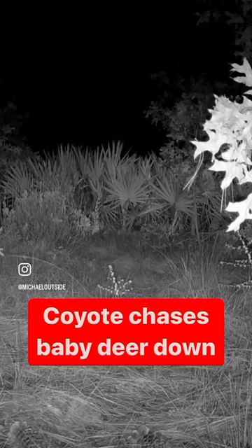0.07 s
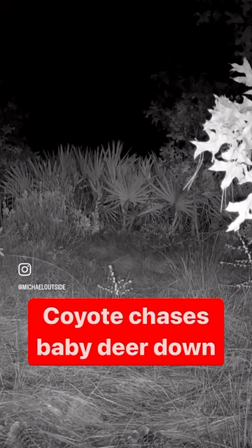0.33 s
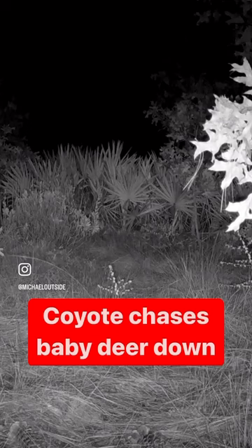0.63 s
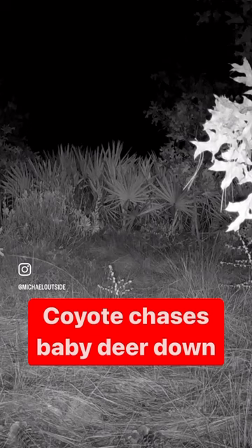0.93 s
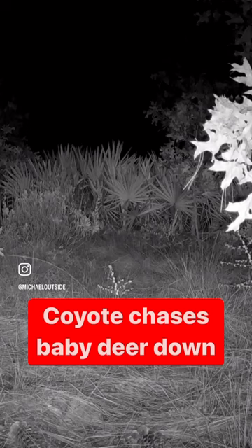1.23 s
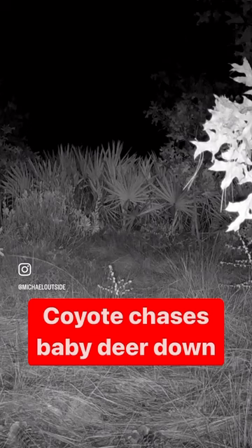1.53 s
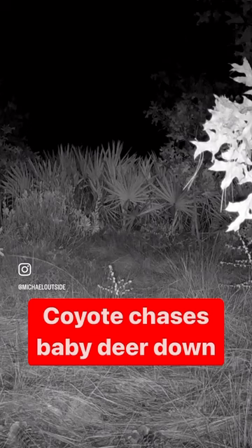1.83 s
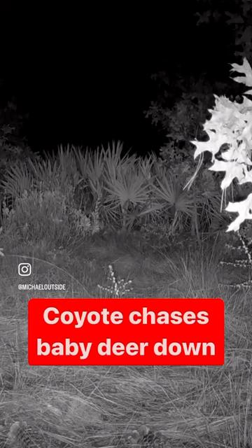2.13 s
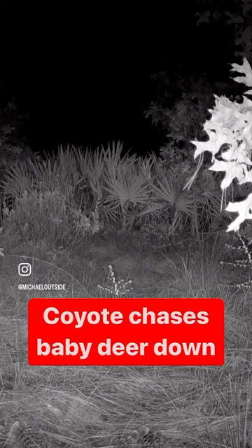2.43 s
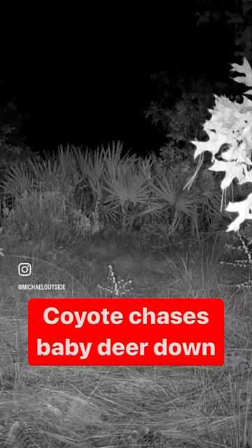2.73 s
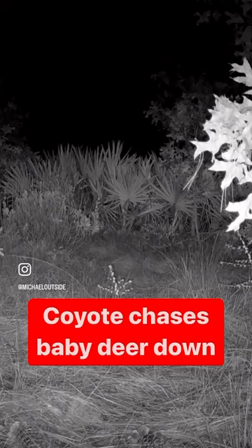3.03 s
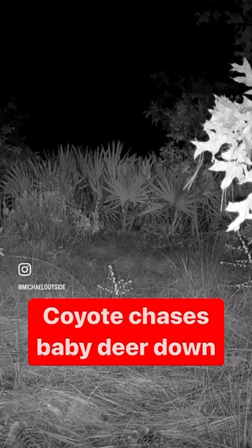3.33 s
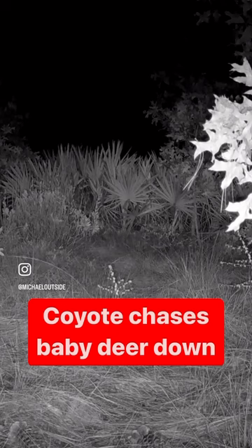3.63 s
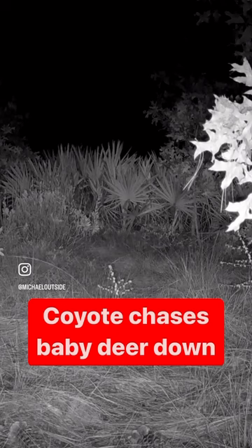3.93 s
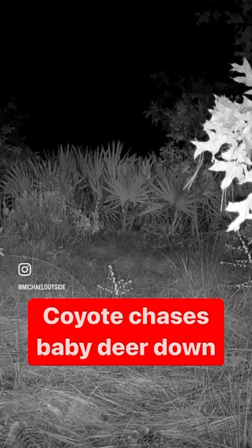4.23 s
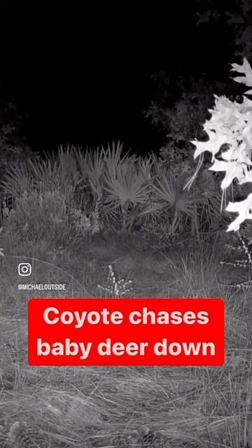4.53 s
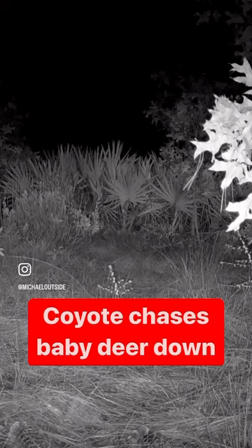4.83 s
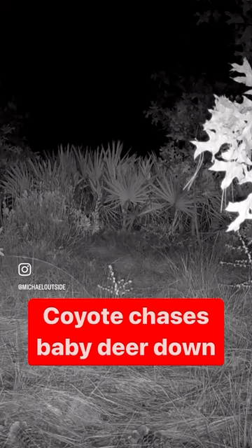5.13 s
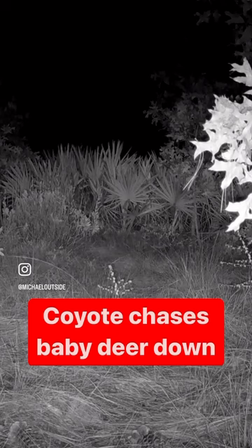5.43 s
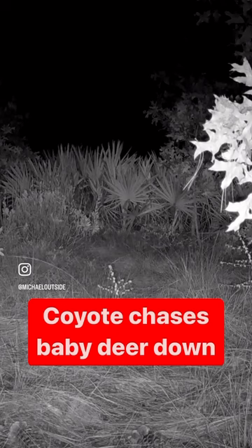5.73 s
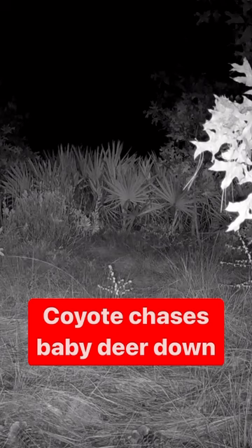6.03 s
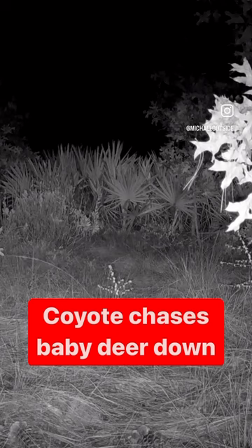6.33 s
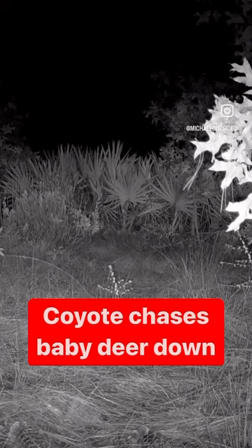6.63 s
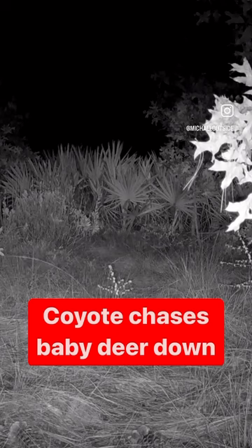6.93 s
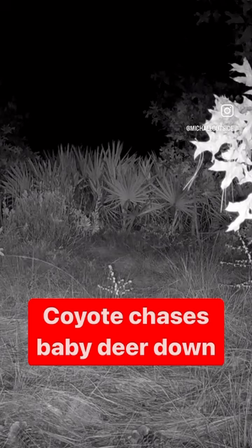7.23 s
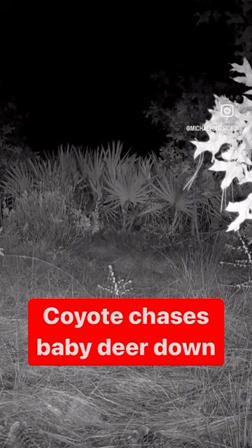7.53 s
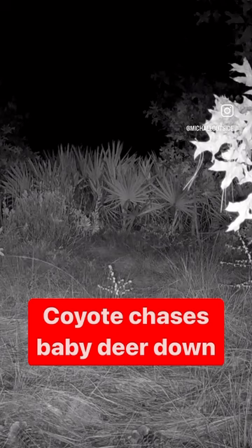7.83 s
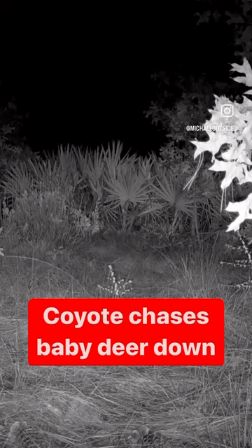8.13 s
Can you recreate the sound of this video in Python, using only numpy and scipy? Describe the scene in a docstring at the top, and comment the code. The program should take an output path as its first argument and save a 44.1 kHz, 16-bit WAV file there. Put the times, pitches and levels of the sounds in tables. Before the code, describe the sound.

A fawn gives one loud, cracking bleat over a trilling cricket, then animals rustle and crunch faintly through the brush.

```python
"""A fawn gives one loud bleat that cracks and falls away, and the night-time trees ring after it.
Its voice is a stack of tones from the throat, shaped by the mouth and roughened by puffs of air.
Animals push through the brush, mostly after the cry: leaves rustle, stalks crunch, feet thud.
A cricket trills by scraping its wings, pausing twice, over a soft hush and a far-off rumble."""
import sys
import numpy as np
from scipy import signal
from scipy.fft import rfft, irfft, next_fast_len
from scipy.io import wavfile
from scipy.ndimage import map_coordinates

SR = 44100
rng = np.random.default_rng(int(sys.argv[2]) if len(sys.argv) > 2 else 0)


def store_pcm(level_fs):
    """Save levels as 16-bit WAV."""
    pcm = np.round(np.clip(level_fs, -1, 1) * 32767).astype(np.int16)
    wavfile.write(sys.argv[1], SR, np.atleast_2d(pcm).T)


N = 360297

# tone colour of rubbed stems (frequency [Hz], relative level [dB])
STEM_COLOUR = [(100, -33.5), (400, -15.5), (950, -13.5), (1400, 1), (2500, 1), (3300, -10.5), (5000, -32.5),
               (8000, -49.5)]
# tone colour of dry leaf tips (frequency [Hz], relative level [dB])
LEAF_COLOUR = [(1500, -14.5), (3000, 5.5), (4000, 3.5), (5200, -4), (7000, -15.5), (8800, -26.5),
               (14000, -35)]


def fawn(jitter=0.0118, shimmer=0.84, flutter_db=5, wobble=0.95, mouth_db=10, mouth_width_hz=480):
    """A strained bleat: the vocal folds buzz, the moving mouth lifts some overtones, and air rasps."""
    # overtones of the throat (frequency [Hz], relative level [dB])
    throat = [(1700, 6), (2600, -0.5), (3300, -1.5), (3900, -1), (4600, -4), (5200, -16), (5900, -18),
              (6600, -28), (7300, -33), (8500, -51.5), (13000, -69)]
    # tone colour of the rasp (frequency [Hz], relative level [dB])
    rasp_colour = [(300, -34.5), (800, -25), (1200, -11), (2000, -4), (2900, 16), (4300, -0.5), (6000, 2),
                   (8000, -51), (14000, -58.5)]
    gate, pitch, octave_db, over_db, mouth_hz, rough = bleat_shape()
    on = gate > 0
    shaky_pitch = pitch * (1 + jitter * (0.13 + 2 * rough) * walk(700))
    phase = 2 * np.pi * np.cumsum(shaky_pitch)[on] / SR
    overtones, power = 0, 0
    for k in np.arange(3, 17):
        hz = k * pitch[on]
        mouth_lift = undb(mouth_db * np.exp(-((hz - mouth_hz[on]) / mouth_width_hz) ** 2))
        # high tones flutter most, in level and timing, as the head moves behind the leaves
        flutter = np.minimum(hz / 4000, 1) ** 2
        gain = gain_at(hz, throat) * mouth_lift * undb(flutter_db * flutter * walk(70)[on])
        lag = rng.uniform(0, 2 * np.pi) + wobble * flutter * (walk(100) + rough * walk(400))[on]
        overtones += gain * np.sin(k * phase + lag)
        power += gain ** 2
    # where the voice is rough the folds shut with uneven force
    overtones = overtones / np.sqrt(power) * (1 + shimmer * rough * walk(600))[on]
    # the cry starts thin; its lowest tone grows once the pitch has settled
    lowest_db = over_db[on] + np.interp(clock()[on], [4.68, 4.77], [-38, -29])
    core = undb(octave_db[on]) * np.sin(2 * phase) + undb(lowest_db) * np.sin(phase)
    # air escapes in a puff each time the folds open
    rasp = (noise(rasp_colour) * rough * undb(over_db - 9))[on] * (1 + np.cos(phase))
    voice = np.zeros(N)
    voice[on] = np.sqrt(2) * (core + undb(over_db[on]) * overtones) + rasp
    return gate * voice


def bleat_shape(start_s=4.495, end_s=5.05, attack_s=0.042, release_s=0.029, settle_s=0.038):
    """How the bleat moves over time: it starts and ends rough, and cracks three times."""
    # the pitch scoops up, slips at a crack, holds and falls away (time [s], pitch [Hz])
    melody = [(4.51, 522), (4.585, 634), (4.66, 680.6), (4.705, 669.3), (4.72, 635.7), (4.765, 662),
              (4.82, 649.8), (4.978, 648.2), (5.008, 561.6), (5.05, 521)]
    # where the mouth rings (time [s], frequency [Hz])
    mouth = [(4.52, 3120), (4.6, 3790), (4.7, 3380), (4.725, 2100), (4.79, 3420), (4.84, 2352), (4.9, 2380),
             (4.94, 3500), (4.99, 2752)]
    # the voice's effort (time [s], tone an octave above the pitch [dB], higher overtones [dB])
    effort = [(4.52, -72.5, -45.5), (4.585, -37, -42.5), (4.645, -28, -39), (4.725, -29, -35),
              (4.795, -43, -39.5), (4.83, -27.5, -38.5), (4.89, -27.5, -29.5), (4.935, -35.5, -31.5),
              (4.975, -33, -38), (5.025, -36.5, -38.5)]
    # cracks in the voice (time [s], added roughness [0-1], jump in level [dB])
    cracks = [(4.724, 0.06, 3.5), (4.817, 0.34, 1.5), (4.994, 0.17, 6.5)]
    pitch, = curves(melody)
    mouth_hz, = curves(mouth)
    octave_db, over_db = curves(effort)
    since, left = np.maximum(clock() - start_s, 0), np.maximum(end_s - clock(), 0)
    gate = np.minimum(since / attack_s, 1) * np.minimum(left / release_s, 1)
    rough = 0.15 + 0.65 * np.exp(-(np.minimum(since, left) / settle_s) ** 2)
    for at, added_rough, jump_db in cracks:
        crack = bump(at, half_s=0.0093)
        rough += added_rough * crack
        octave_db += jump_db * crack
        over_db += jump_db * crack
    octave_db -= 25 * bump(4.795, half_s=0.017)  # this tone drops out for a moment
    return gate, pitch, octave_db, over_db, mouth_hz, rough


def brush(rise_share=0.43, stir_stems_db=-76, stir_leaves_db=-97):
    """Bodies drag through softly stirring stems and leaves: each push is a swelling patter of ticks."""
    # pushes through the brush (peak time [s], stem level [dB], leaf level [dB], fade time [s])
    pushes = [(1.226, -54, -78, 0.1), (3.3, -66.5, -77.5, .12), (4.5, -60.5, -66, 0.19),
              (4.98, -53, -61, 0.21), (5.379, -57.5, -60.5, 0.1), (5.751, -68, -69.5, 0.082),
              (5.87, -57.5, -66.5, 0.31), (6.08, -54, -61.5, 0.096), (6.21, -58.5, -63, 0.25),
              (6.51, -60, -64.5, 0.23), (6.73, -65, -68, 0.053), (6.9, -64.5, -65, 0.21),
              (7.55, -67, -71.5, 0.6), (7.83, -59, -62.5, 0.07), (7.95, -58, -60.5, 0.16)]
    t = clock()
    stems, leaves = undb(stir_stems_db), undb(stir_leaves_db)
    for at, stems_db, leaves_db, fade_s in pushes:
        from_peak = np.maximum(t - at, (at - t) / rise_share)  # builds faster than it fades
        push = np.exp(-np.minimum(from_peak / fade_s, 20))
        stems = np.hypot(stems, undb(stems_db) * push)
        leaves = np.hypot(leaves, undb(leaves_db) * push)
    surge = undb(1.7 * walk(45))
    return surge * (stems * noise(STEM_COLOUR, grain_db=2) + leaves * noise(LEAF_COLOUR, grain_db=1))


def crunches(ring_width_hz=690):
    """A stalk gives way in a burst of snapping fibres that ring its hollow stem."""
    # breaking stalks (time [s], level [dB], ring [Hz], fade time [s], sharp crack against ring [dB])
    stalks = [(.756, -54.5, 2380, 0.026, -19), (5.847, -45.5, 2370, 0.013, -11),
              (5.857, -43, 2052, 0.014, -18), (5.911, -44, 2070, .008, -16), (5.926, -49, 1770, 0.02, -10),
              (5.956, -37.5, 2550, 0.005887, -8.5), (6.011, -39, 2400, 0.0089, -30),
              (6.019, -47, 1970, .004, -24), (6.098, -45.5, 1480, .013, -19),
              (6.112, -38, 2600, 0.0028, -20), (6.532, -51.5, 2134, .02, -22),
              (7.054, -53.5, 2296, .009, -15.5), (7.9338, -38.5, 2520, 0.0021, -16),
              (8.146, -53.5, 2470, .0054, -2)]
    fibres, crack = noise(STEM_COLOUR), noise(LEAF_COLOUR)
    sound = np.zeros(N)
    for at, db, hz, fade_s, crack_db in stalks:
        ring = signal.lfilter(*signal.iirpeak(hz, hz / ring_width_hz, fs=SR), fibres)
        sound += undb(db) * blow(at, fade_s) * (unit(ring) + undb(crack_db) * crack)
    return sound


def knock(at_s=6, level_db=-44, pitch_hz=1368, fade_s=0.01):
    """A struck hollow stem rings briefly on one note without breaking."""
    return undb(level_db) * blow(at_s, fade_s) * unit(np.sin(2 * np.pi * pitch_hz * clock()))


def thuds(fade_s=0.027):
    """Feet land dully on soft soil."""
    # footfalls (time [s], level [dB])
    steps = [(5.37, -64.5), (5.721, -82), (5.955, -71), (5.859, -72), (6.047, -66), (6.097, -65),
             (6.531, -62.5), (6.643, -66)]
    # tone colour of a footfall (frequency [Hz], relative level [dB])
    soil = [(30, -32), (80, -1), (160, 8.5), (300, 6.5), (600, -16), (1200, -16), (4000, -69)]
    return noise(soil) * sum(undb(db) * blow(at, fade_s) for at, db in steps)


def cricket(stroke_hz=68.28, level_db=-59, scatter_db=-6, scatter_s=0.067):
    """Each wing stroke rings one short note that sags in pitch; the grass scatters it."""
    # one wing stroke (progress [0-1], pitch [Hz], relative level [dB])
    stroke = [(0, 2910, -35), (0.099, 2970, -13), (0.219, 2933, -3), (.4, 2928, -3.5), (0.602, 2860, -4),
              (.76, 2756, -10), (.88, 2680, -14), (1, 2664, -36.5)]
    # stretches of song (start [s], end [s])
    trills = [(-0.2, 1.835), (2.034, 3.57), (3.85, 8.4)]
    # missed strokes, where the song dips briefly (time [s])
    missed = [0.144, .925, 1.02, 2.85, 5.55, 5.82, 8.065]
    t = clock()
    progress = np.cumsum(stroke_hz * (1 + 0.003045 * walk(30))) / SR % 1
    share, hz, db = np.transpose(stroke)
    grid = np.arange(int(SR / stroke_hz)) * stroke_hz / SR
    cycles = np.interp(progress, grid, np.cumsum(np.interp(grid, share, hz)) / SR)
    # the wings catch a little differently on every stroke
    notes = np.sin(2 * np.pi * cycles + walk(70)) * undb(np.interp(progress, share, db) + 0.4 * walk(40))
    singing = sum(np.clip((t - start) / 0.087, 0, 1) * np.clip((end - t) / 0.02, 0, 1)
                  for start, end in trills)
    song = notes * singing * (1 - 0.66 * sum(bump(at, half_s=0.0097) for at in missed))
    wavering = song * np.cos(2.76 * walk(45))
    lag = t[:SR // 4]
    grass = rng.standard_normal(len(lag)) * np.exp(-lag / scatter_s)
    scattered = signal.fftconvolve(wavering, grass)[:N]
    return undb(level_db) * unit(unit(song) + undb(scatter_db) * unit(scattered))


def frond_echo(sound):
    """Nearby palm leaves scatter a short wash of sound, strongest in the treble."""
    # what the leaves send back (frequency [Hz], gain [dB])
    fronds = [(1300, -9.5), (2000, -18.5), (2600, -4.5), (3300, -2.5), (4500, -3), (8000, -3.5)]
    return echo(sound, fronds, gain_db=-1, ring_s=0.26, delay_s=0.0034)


def tree_echo(sound):
    """Far trunks return a long, faint echo."""
    # what the trunks send back (frequency [Hz], gain [dB])
    trunks = [(500, 7), (1100, 10), (1300, 1), (1600, -2.5), (2800, -4.5), (4500, -2), (8000, -1.5)]
    return echo(sound, trunks, gain_db=-18.5, ring_s=1.46, delay_s=0.055)


def night(hush_db=-65, swell_at_s=5.9, swell_db=3.6):
    """A soft, steady hush lies over a far-off rumble that holds, swells once and sinks back."""
    # still night air and faint hiss (frequency [Hz], relative level [dB])
    air = [(25, -21.5), (120, -8.5), (360, -8.5), (700, 0.5), (1300, 1), (2500, -1.5), (3400, -13),
           (4800, -19.5), (8500, -35), (14000, -38.5)]
    # tone colour of the rumble (frequency [Hz], relative level [dB])
    rumble = [(25, -20), (50, -21), (80, -4), (100, -8), (125, 1.5), (180, -9), (300, -16.5), (800, -44.5)]
    rumble_db = np.interp(clock(), [swell_at_s, N / SR], [-79, -84.5])
    rumble_db += swell_db * bump(swell_at_s, half_s=0.6)
    return noise(air) * undb(hush_db + 0.28 * walk(4.5)) + noise(rumble) * undb(rumble_db)


def echo(sound, points, gain_db, ring_s, delay_s):
    """A dense cloud of reflections with its own tone colour, fading by 60 dB in ring_s."""
    t = clock()[:2 * SR]
    tail = rng.standard_normal(len(t)) * np.exp(-np.log(1000) * t / ring_s) * (t > delay_s)
    return undb(gain_db) * signal.fftconvolve(sound, colour(tail / np.linalg.norm(tail), points))[:N]


def noise(points, grain_db=0):
    """Noise of strength 1 with a given tone colour; grain_db breaks it into short, uneven grains."""
    size = next_fast_len(N, True)
    grains = np.repeat(rng.exponential(size=size // 32 + 1), 32)[:size]
    grainy = rng.standard_normal(size) * undb(grain_db * np.minimum(grains, 6))
    return unit(colour(grainy, points)[:N])


def colour(x, points):
    """Filter a sound by a table of (frequency [Hz], gain [dB])."""
    return irfft(rfft(x) * gain_at(np.fft.rfftfreq(len(x), 1 / SR), points), len(x))


def gain_at(hz, points):
    """Look up gains in a table of (frequency [Hz], gain [dB])."""
    table_hz, db = np.transpose(points)
    return undb(np.interp(np.log(hz + 1), np.log(table_hz), db))


def walk(rate):
    """A random wander of size about 1 that turns rate times a second."""
    steps = rng.standard_normal(N // 4)
    return map_coordinates(steps, [clock() * rate], order=1, mode="wrap") * np.sqrt(3 / 2)


def blow(start_s, fade_s):
    """The loudness of a hit: it rises quickly, then dies away."""
    age = np.maximum(clock() - start_s, 0)
    return np.minimum(age / 0.00074, 1) * np.exp(-np.minimum(age / fade_s, 50))


def bump(at, half_s):
    """A smooth rise and fall around one moment, 1 at the top."""
    return np.exp(-((clock() - at) / half_s) ** 2)


def curves(table):
    """Join each column of a table with straight lines over time."""
    times, *columns = np.transpose(table)
    return [np.interp(clock(), times, column) for column in columns]


def undb(db):
    """Turn decibels into a multiplier."""
    return 10 ** (np.asarray(db) / 20)


def unit(x):
    """Scale a sound to an average strength (rms) of 1."""
    return x / np.sqrt(np.mean(x ** 2))


def clock():
    """The time of every sample, in seconds."""
    return np.arange(N) / SR


def scene():
    """Mix the animals, their echoes and the night into one channel."""
    bleat = fawn()
    animals = bleat + crunches() + knock() + thuds()
    return (animals + frond_echo(bleat) + tree_echo(animals) + brush() + cricket() + night())[None]


def record(dry, top_hz=14400):
    """A steep filter cuts the highest treble."""
    return signal.sosfilt(signal.ellip(8, .2, 70, top_hz, fs=SR, output="sos"), dry)


dry = scene()
out = record(dry)
store_pcm(out)
```